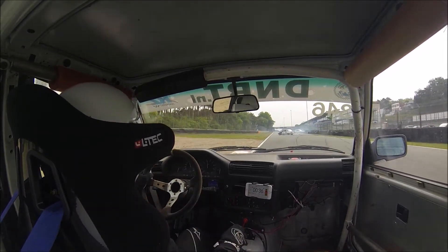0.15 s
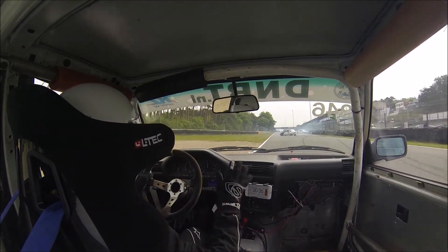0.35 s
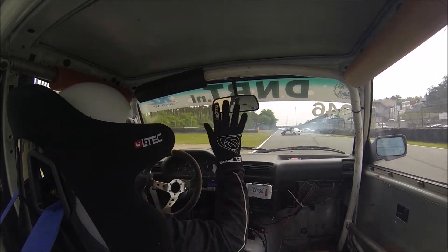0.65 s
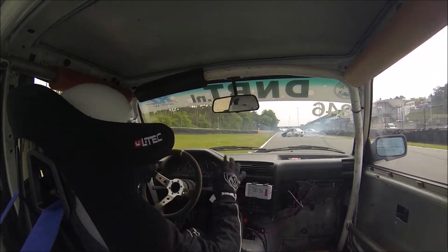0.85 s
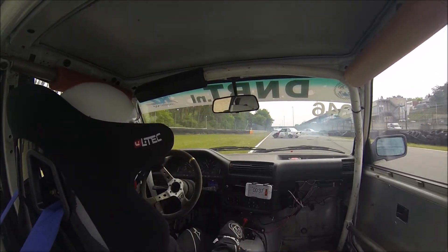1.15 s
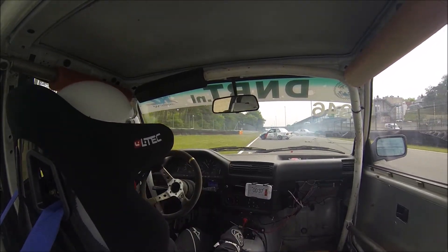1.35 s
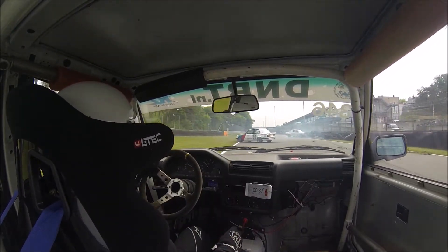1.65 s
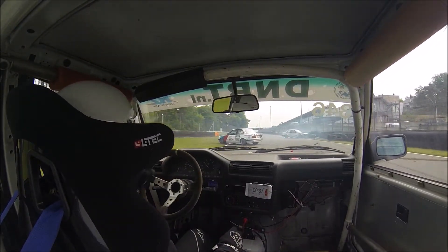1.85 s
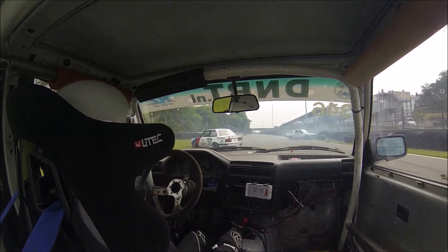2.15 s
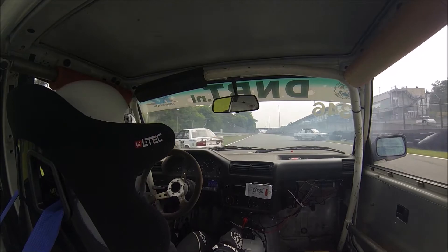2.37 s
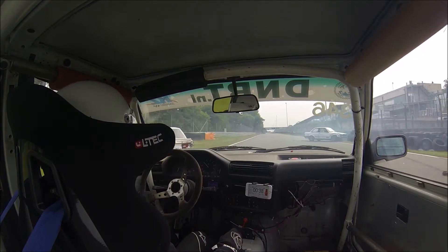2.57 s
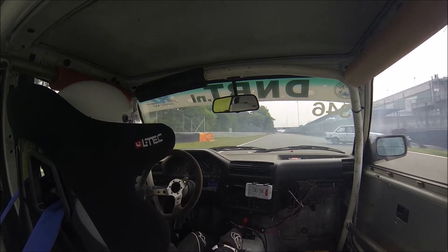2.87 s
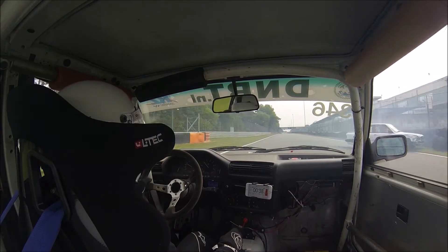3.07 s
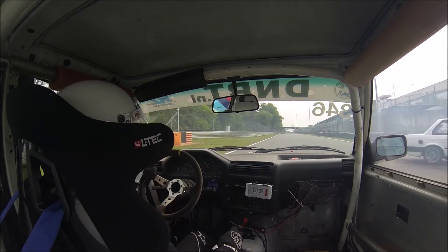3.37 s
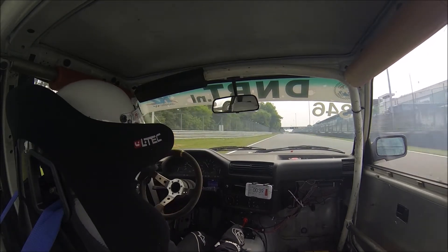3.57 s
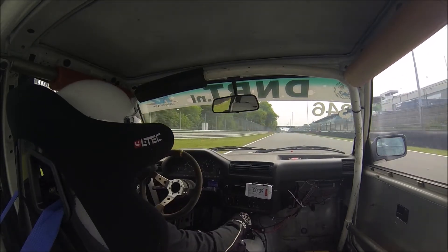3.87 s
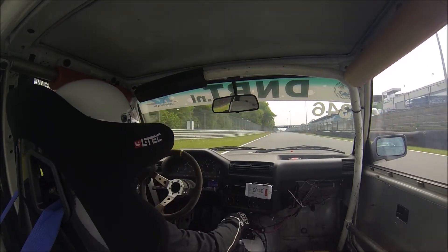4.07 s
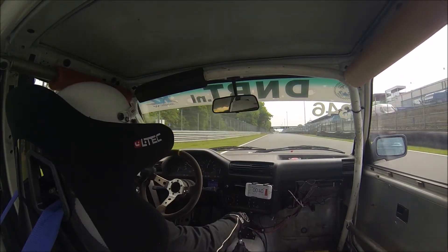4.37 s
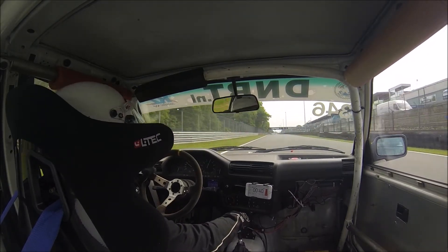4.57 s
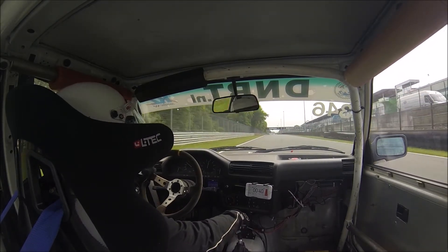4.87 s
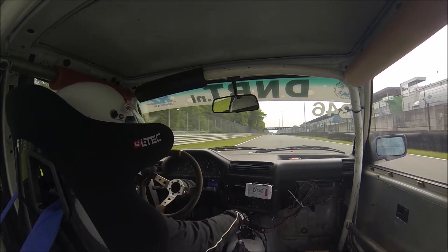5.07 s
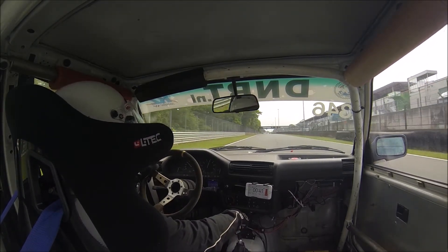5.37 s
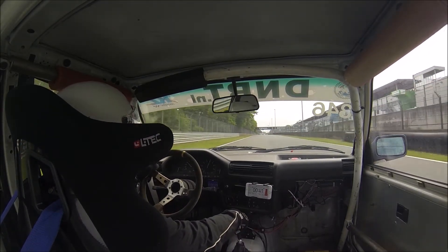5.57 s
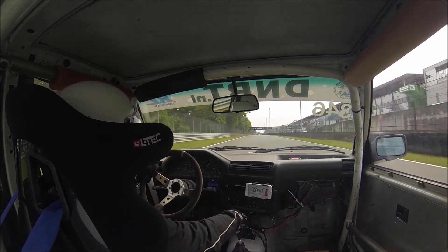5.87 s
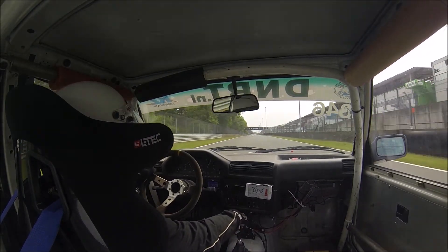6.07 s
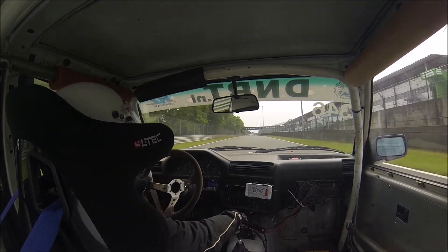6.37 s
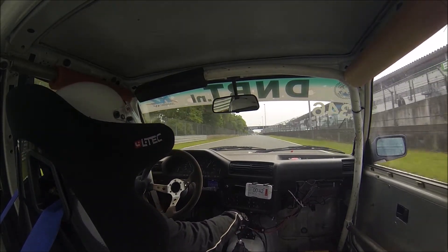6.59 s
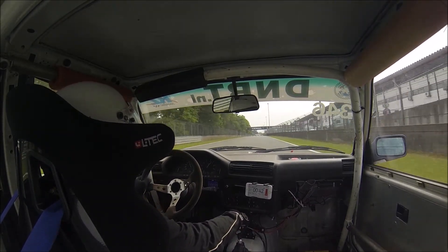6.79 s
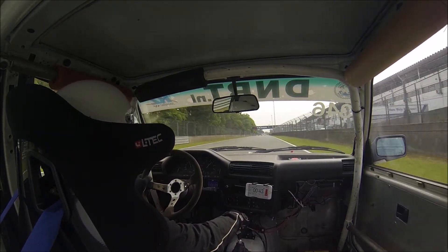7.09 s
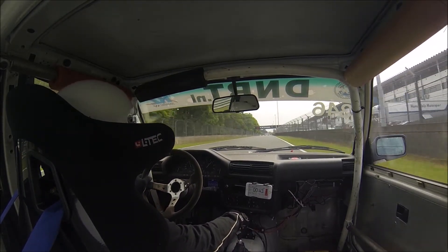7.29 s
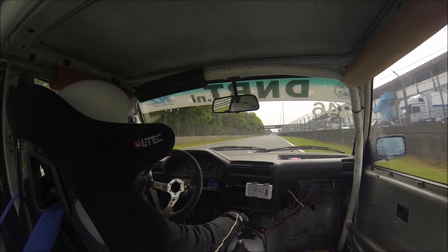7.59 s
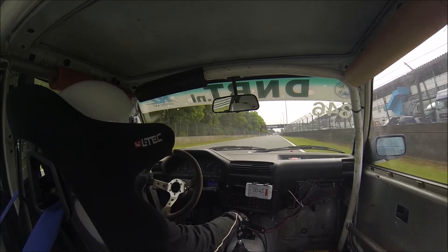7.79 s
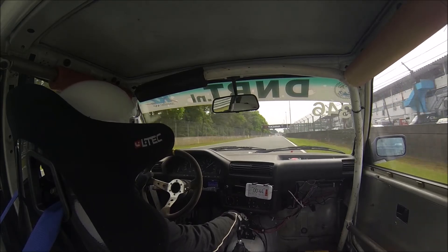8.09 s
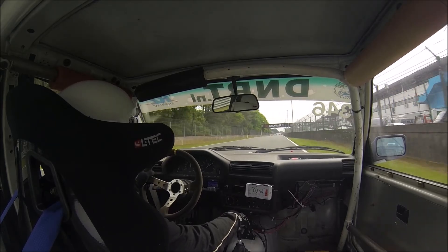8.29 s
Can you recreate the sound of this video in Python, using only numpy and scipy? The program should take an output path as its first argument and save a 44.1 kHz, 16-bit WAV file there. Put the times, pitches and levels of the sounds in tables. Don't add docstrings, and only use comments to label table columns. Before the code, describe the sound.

Inside a stripped race car, a six-cylinder engine slows, clanks through the gear linkage, blips, then climbs in a long pull that fades out.

```python
import sys
import numpy as np
from scipy import signal
from scipy.fft import rfft, irfft
from scipy.io import wavfile
from scipy.ndimage import uniform_filter1d

SR = 44100
rng = np.random.default_rng(int(sys.argv[2]) if len(sys.argv) > 2 else 0)


def file_out(sig):
    cols = np.atleast_2d(sig).T
    lim = np.clip(cols, -1, 1)
    pcm = np.round(lim * 32767).astype(np.int16)
    wavfile.write(sys.argv[1], SR, pcm)


def invert_db(x):
    u = np.asarray(x, float) / 20
    return 10 ** u


N = 372204
T = np.arange(N) / SR


def level(x, db):
    return x * invert_db(db) / np.sqrt(np.mean(x ** 2))


def curves(table):
    t_s, *columns = np.transpose(table)
    return [np.interp(T, t_s, c) for c in columns]


def peaks(hz, modes):
    return np.sqrt(1 + sum(invert_db(2 * db) / (1 + (2 * (hz - f) / w) ** 2) for f, w, db in modes))


def walk(rate_hz):
    hold = int(SR / rate_hz)
    steps = np.repeat(rng.standard_normal(N // hold + 1), hold)
    return 1.246 * uniform_filter1d(uniform_filter1d(steps, hold), hold)[:N]


def colour(x, spectrum, modes):
    hz = np.fft.rfftfreq(N, 1 / SR) + 1e-3
    f_hz, db = np.transpose(spectrum)
    gain = invert_db(np.interp(np.log(hz), np.log(f_hz), db, -90, -90)) * peaks(hz, modes)
    return level(irfft(rfft(x) * gain, N), 0)


def patchy(x, edges_hz, patch_db, rate_hz):
    spec, hz, common = rfft(x), np.fft.rfftfreq(N, 1 / SR), walk(rate_hz)
    out = np.zeros(N)
    for lo, hi in zip(edges_hz, edges_hz[1:]):
        band = irfft(spec * (hz >= lo) * (hz < hi), N)
        out += invert_db(patch_db * (walk(rate_hz) + common)) * band
    return out


def ring(x, modes):
    out, sign = 0, 1
    for f, w, db in modes:
        b, a = signal.iirpeak(f, f / w / 2.0, SR)
        out = out + sign * invert_db(db) * signal.lfilter(b, a, signal.lfilter(b, a, x))
        sign = -sign
    return out


# start t/s, end t/s, order, level/dB
ORDER_SWELLS = [(0, .45, 8, -24.5), (1.22, 1.62, 10, -23), (1.47, 2.14, 3, -23.5), (2.12, 2.748, 22, -27.5),
                (2.19, 2.31, 12, -14), (2.15, 2.32, 18, -20), (2.32, 2.46, 6, -19), (2.34, 2.59, 15, -25.5),
                (2.59, 3.42, 24, -29.5), (1.4, 1.92, 18, -27.5), (3.69, 3.86, 12, -17),
                (4.1, 4.22, 12, -20), (4.2, 4.29, 18, -18), (4.14, 4.26, 5, -21.5), (2.37, 2.48, 12, -18),
                (4.69, 4.828, 18, -14), (4.8, 5.3, 16, -24), (4.95, 5.6, 7, -27), (5.55, 7.04, 14, -34.5),
                (5.88, 6.67, 19, -37), (5.94, 6.73, 26, -38), (4.33, 4.69, 6, -26), (6.04, 6.8, 17, -35),
                (6.21, 6.65, 24, -33.5), (7.85, 8.44, 2, -26), (6.7, 8.02, 24, -41), (4.7, 5.004, 9, -25),
                (7.15, 7.95, 23, -33.5), (3.4, 3.7, 15, -26), (8.18, 8.44, 12, -24)]


def bloom(order, t):
    out = 0
    for start, end, which, db in ORDER_SWELLS:
        if round(which) == order:
            edge_s = 0.39 * (end - start)
            out = out + invert_db(db) * np.clip(np.minimum(t - start, end - t) / edge_s + 0.38, 0, 1)
    return out


# f/Hz, width/Hz, level/dB
EXHAUST_MODES = [(118.2, 16, -14.5), (140.3, 9.7, -16.5), (200.2, 21, -17), (216.8, 10.3, -13),
                 (233.4, 8, -16), (242.5, 14, -19), (265.3, 21, -13), (374.6, 40, -6.5), (405, 24, -5),
                 (456.7, 14, -6), (483.6, 17, -0.5), (506.6, 25, -2), (628, 79, 2.5), (694, 43, 4.5)]


def carried(hz):
    floor_db = -30.5
    power = sum(invert_db(2 * db) / (1 + (2 * (hz - f) / w) ** 2) ** 2 for f, w, db in EXHAUST_MODES)
    return np.sqrt(invert_db(2 * floor_db) + power)


HARMONIC_DB = (-1, -14, -28.5)
# t/s, level/dB
THROTTLE = [(0, -3.5), (.6, 0), (.95, 1), (1.15, -6), (1.4, -4.5), (1.75, -6), (2.15, 1), (2.6, -3.5),
            (3.3, 0.5), (3.62, -14), (3.85, 0.5), (4.12, -9), (4.27, -1.5), (4.52, -2.5), (4.68, -6),
            (4.88, 0), (5.2, -1.5), (8.44, 1)]


def firing(turn, hz):
    throttle_db, out = curves(THROTTLE)[0], np.zeros(N)
    for k, db in enumerate(HARMONIC_DB, start=1):
        harmonic_db = db + throttle_db * (1 + 0.73 * (k - 1)) + 0.8 * walk(6)
        size = invert_db(harmonic_db) * carried(k * hz) + bloom(6 * k, T)
        out += size * invert_db(1.4 * walk(22)) * np.sin(k * turn + 6 * rng.random())
    return out


# f/Hz, width/Hz, level/dB
CABIN_MODES = [(96, 19, 12), (134.6, 3.3, 13), (192, 5.3, 12.5), (220, 12.6, 13.5), (282.4, 8.2, 8.5),
               (321, 15, 8.5), (386, 12, 6.5), (483, 8.2, -8.5), (512, 17, 9), (551, 9.7, 10),
               (596, 27, 4.5), (696, 9.5, 7.5), (765, 18, -9), (965, 10, 6.5), (980, 21, 7.5),
               (1067, 29, 9.5)]


def uneven(cycle, hz, load_db):
    slow, out = slice(None, None, 512), np.zeros(N)
    for order in range(1, 33):
        if order in (6, 12, 18):
            continue
        db = -35 - 0.17 * order - 3 * (order % 2)
        drift = uniform_filter1d(rng.standard_normal(len(T[slow])), size=4) * 2.2
        size = peaks(order * hz[slow] / 6, CABIN_MODES) * invert_db(db - 9 + load_db[slow] + 4.1 * drift)
        size = size + invert_db(1.4 * drift) * bloom(order, T[slow])
        out += np.interp(T, T[slow], size) * np.sin(order * cycle + 6 * rng.random())
    return out


# f/Hz, level/dB per Hz
GAS_SPECTRUM = [(530, -4), (900, 0), (1000, -5), (1130, -3.5), (1300, -6.5), (1910, -7), (2260, -11),
                (2450, -12), (2820, -15), (3370, -18), (3790, -21.5), (5530, -34.5), (6220, -37.5),
                (11100, -50), (15100, -51.5)]
# f/Hz, width/Hz, level/dB
HOUSING_MODES = [(2050, 310, 0), (2420, 20, 11), (2460, 29, 7.5), (2606, 15, 9), (3286, 240, 1),
                 (5520, 430, 3.5), (8920, 550, 2), (11020, 760, 4)]


def gas_noise(turn, cycle, hz, load_db):
    pattern = rng.standard_normal(512)
    place = (cycle / (2 * np.pi) % 1 * len(pattern)).astype(int)
    clatter = invert_db(load_db - 9) * pattern[place]
    puff = 1 + 0.1 * np.cos(turn) + 0.05 * np.cos(cycle)
    gas = colour(puff * rng.standard_normal(N) + clatter, GAS_SPECTRUM, HOUSING_MODES)
    gas = patchy(gas, (0, 1600, 2800, 5000, 8000, SR), 0.74, 8.3)
    hiss = signal.lfilter(*signal.butter(4, 9500, "high", fs=SR), gas)
    hiss_db = 1.9 * (load_db / 5 + hz / 200 - 9.5)
    return gas - hiss + hiss * invert_db(hiss_db)


# t/s, firing f/Hz
REVS = [(0, 165.1), (1.125, 131.5), (1.25, 118), (1.625, 110.3), (2.0, 108.5), (2.5, 111.3), (2.75, 115.6),
        (3.62, 124.5), (3.74, 136.9), (4.178, 139.3), (4.22, 171), (4.375, 201.5), (4.5, 211.8),
        (4.62, 204), (4.725, 180.5), (4.875, 186.6), (7.3, 247), (8.44, 271.5)]
# t/s, level/dB
LOAD = [(0, -2.5), (.5, 3), (.75, -4.5), (2.05, -5.5), (2.12, -1.5), (2.3, -9.5), (2.7, 3), (3, -10.5),
        (3.5, -2.5), (4.15, -3), (4.25, 7), (4.5, -4.5), (4.7, -1.5), (5, 2.5), (5.9, 2.5), (6.8, 8.5),
        (7.25, 1), (8.44, 5.5)]


def engine(gas_db):
    (hz,), (load_db,) = curves(REVS), curves(LOAD)
    turn = 2 * np.pi * np.cumsum(hz * (1 + .003 * walk(25))) / SR
    cycle = turn / 6
    orders = firing(turn, hz) + uneven(cycle, hz, load_db)
    return np.sqrt(2) * orders + invert_db(gas_db + 2.0) * gas_noise(turn, cycle, hz, load_db)


# f/Hz, level/dB per Hz
ROAR_SPECTRUM = [(60, -6.5), (95, -7.5), (160, -8.5), (250, -6), (420, -10), (600, -14.5), (1000, -17.5),
                 (1400, -27.5), (2500, -36)]


def road(roar_db):
    softer = [(f, w, db - 3.0) for f, w, db in CABIN_MODES]
    roar = colour(rng.standard_normal(N), ROAR_SPECTRUM, softer)
    return invert_db(roar_db) * patchy(roar, (0, 110, 170, 250, 360, 520, 750, SR), 1.17, 7)


# f/Hz, level/dB per Hz
WIND_SPECTRUM = [(12, -10), (22, -6), (31, 0.5), (45, -4.5), (70, -12.5), (100, -16), (160, -21.5)]
# t/s, level/dB
BUFFET = [(0.0, -28), (0.13, -22.5), (0.2, -18.5), (1.05, -13.5), (1.3, -14), (1.43, -23.5), (1.55, -17.5),
          (2.42, -23.5), (3.01, -15.5), (4.0, -19), (4.5, -20.5), (4.68, -21), (5, -32.5), (5.5, -27),
          (6, -30), (6.8, -28.5), (8.44, -28.5)]


def buffeting():
    flap = colour(rng.standard_normal(N), WIND_SPECTRUM, [(31.0, 1.9, 1.7), (58.3, 8.6, 3.9)])
    return invert_db(curves(BUFFET)[0]) * patchy(flap, (0, 42, 72, SR), 1.7, 4.95)


# t/s, level/dB
BOOM = [
    (0, -19),
    (.3, -25),
    (.6, -17.5),
    (1.3, -27.5),
    (2.2, -27.5),
    (4.55, -41.5),
    (4.65, -24),
    (5.2, -23.5),
    (5.4, -32.5),
    (7, -30),
]


def floor_pan():
    return invert_db(curves(BOOM)[0]) * level(ring(rng.standard_normal(N), [(88.5, 10.8, 0)]), 0)


# t/s, clank level/dB, ring-down t60/s, tick level/dB, sizzle level/dB
SHIFTS = [(1.2, -35, .08, -44, -48), (1.24, -38, 0.093, -47, -50), (1.689, -40, 0.019, -26, -36),
          (1.696, -49, .16, -42, -54.5), (1.795, -28, 0.17, -43, -53), (2.14, -31, 0.15, -47, -49.5),
          (2.19, -22, 0.25, -41, -47.5), (2.638, -42, 0.16, -43, -50), (2.718, -27, 0.1, -32.5, -28),
          (2.728, -5, 0.089, -33, -41.5), (2.744, -14.5, 0.12, -32, -37), (2.825, -20.5, 0.26, -38, -45.5),
          (3.032, -37, .08, -41.5, -44), (3.68, -4, 0.052, -24, -31), (3.687, -12, .2, -30, -34),
          (3.787, -15, 0.13, -38, -39.5), (3.857, -22.5, 0.22, -40, -52)]
# f/Hz, width/Hz, level/dB
CLANK_MODES = [(1460, 230, -10.5), (2130, 670, 4.5), (2280, 535, 8.5), (2820, 460, -12.5), (3187, 140, 0.5),
               (4010, 250, -11.5)]
TICK_MODES = [(4030, 820, 2.5), (5600, 410, -0.5), (5950, 280, 0.5), (7020, 800, -8.5)]
SIZZLE_MODES = [(8380, 560, 7.5), (10600, 2100, 2), (13500, 2200, -8.5)]


def linkage():
    drive = np.zeros((3, N))
    for s, clank_db, t60_s, tick_db, sizzle_db in SHIFTS:
        near = slice(int(s * SR), int((s + 0.34) * SR))
        age = T[near] - s
        shape = (1 - np.exp(-age / 0.00092)) * invert_db(-60 * age / max(t60_s, .01))
        drive[:, near] += shape * invert_db(np.array([[clank_db], [tick_db], [sizzle_db]]))
    knock = invert_db(25.0) * np.clip(np.diff(drive, prepend=0), 0, None)
    bounces = drive * rng.standard_normal((3, N)) * invert_db(0.94 * walk(300))
    clank, tick, sizzle = bounces + knock * rng.choice((-1, 1), N)
    return (invert_db(5.5) * ring(clank, CLANK_MODES) + invert_db(8) * ring(tick, TICK_MODES)
            + invert_db(-2) * ring(sizzle, SIZZLE_MODES))


# t/s, f/Hz, level/dB
SQUEAL = [
    (1.26, 10450, -85),
    (1.3, 10500, -62),
    (1.36, 10420, -58),
    (1.42, 10400, -57),
    (1.47, 10400, -85),
]


def brake():
    hz, db = curves(SQUEAL)
    on = (T > SQUEAL[0][0]) & (T < SQUEAL[-1][0])
    return on * invert_db(db + 2.5 * walk(60)) * np.sin(2 * np.pi * np.cumsum(hz + 40 * walk(150)) / SR)


# t/s, level/dB
BUMPS = [
    (2.084, -19),
]
# f/Hz, width/Hz, level/dB
BUMP_MODES = [(560, 160, 2), (760, 200, -1.5), (1100, 270, -11)]


def bumps():
    attack_s, t60_s = 0.0033, 0.28
    shape = sum(np.clip((T - s) / attack_s, 0, 1) * invert_db(db - 60 * np.abs(T - s) / t60_s) for s, db in BUMPS)
    return shape * level(ring(rng.standard_normal(N), BUMP_MODES), 0)


# t/s, road roar level/dB, valve and gas noise level/dB
SHAKE = [(0, -17.5, -28), (.5, -20, -28.5), (1, -18, -27.5), (1.5, -20, -30), (2.07, -21, -30),
         (2.1, -16, -28), (2.3, -17.5, -27.5), (2.55, -20, -29), (2.8, -20.5, -28), (3.7, -19, -28),
         (4.15, -23.5, -32.5), (4.3, -20, -28), (4.72, -22, -30.5), (5, -22, -28.5), (5.5, -23.5, -29),
         (6.85, -29, -30.5), (7.4, -33, -28.5), (8.3, -31, -27.5)]


def scene():
    roar_db, gas_db = curves(SHAKE)
    mix = engine(gas_db) + road(roar_db) + buffeting() + floor_pan() + linkage() + brake() + bumps()
    return mix[None]


def band_limit(x):
    return signal.sosfilt(signal.butter(12, 15220, fs=SR, output="sos"), x)


# start t/s, end t/s
FADE_S = (4.59, 8.394)


def record(dry):
    faded = 0.93 * np.tanh(dry / 0.93) * np.interp(T, FADE_S, (1, 0))
    cut = signal.sosfilt(signal.ellip(8, .2, 40, 15300, fs=SR, output="sos"), faded)
    return band_limit(cut)


dry = scene()
out = record(dry)
file_out(out)
```